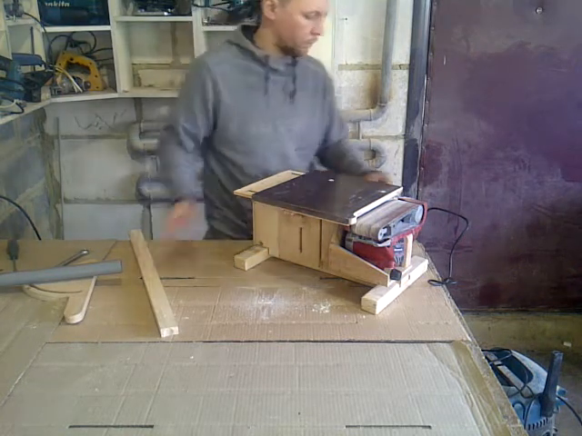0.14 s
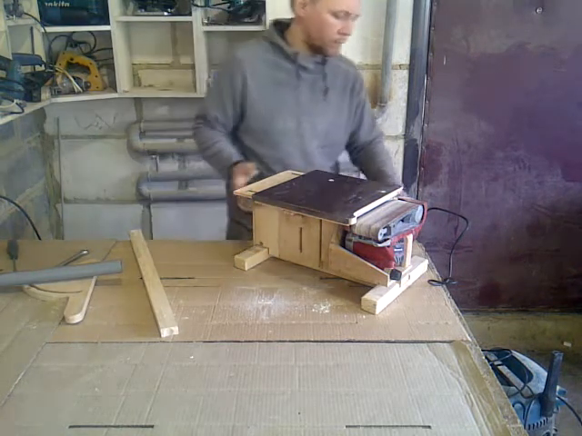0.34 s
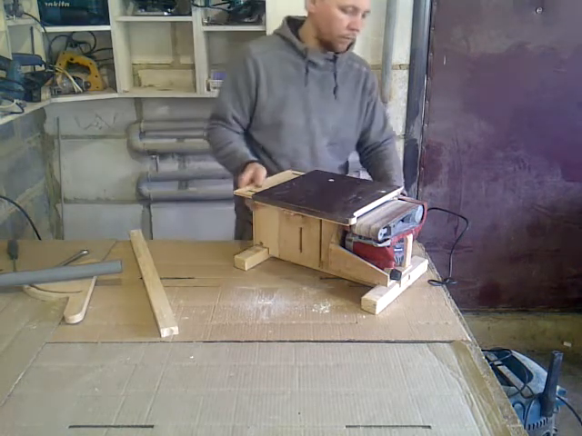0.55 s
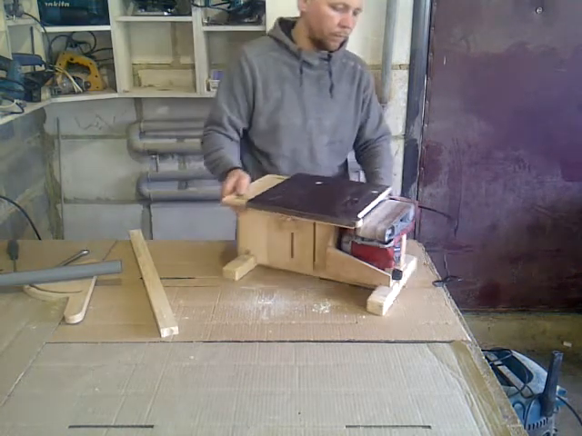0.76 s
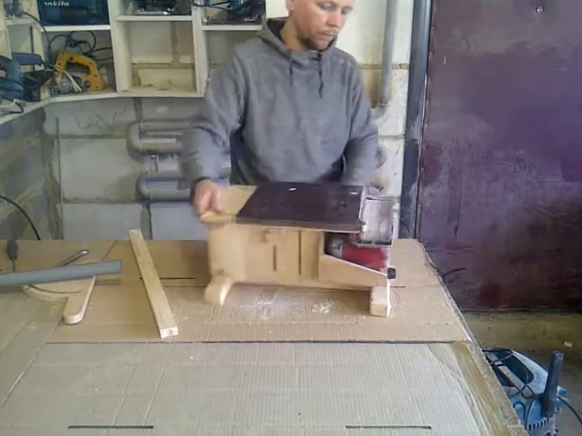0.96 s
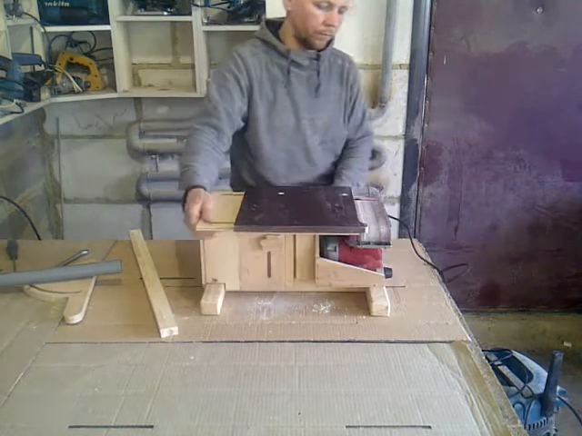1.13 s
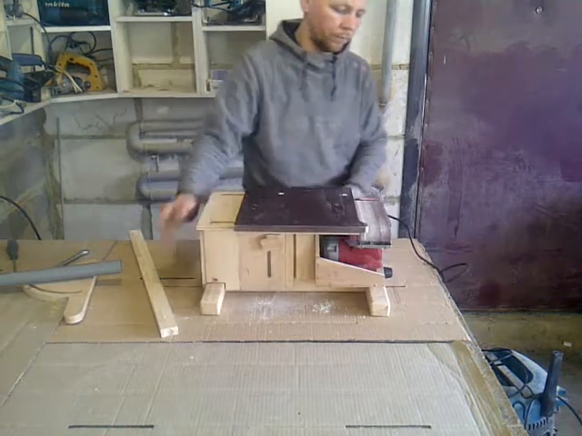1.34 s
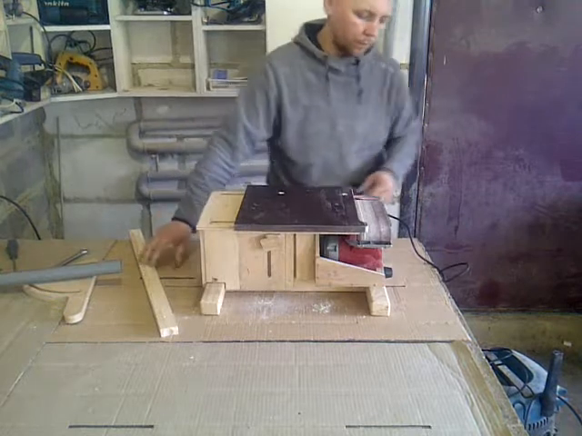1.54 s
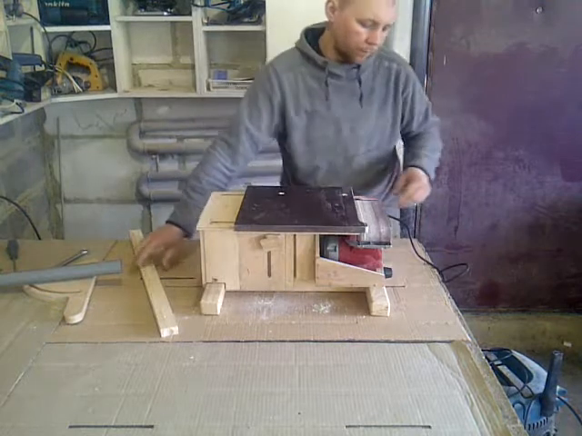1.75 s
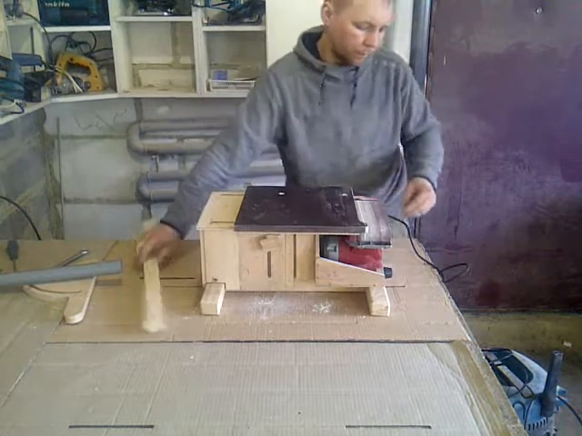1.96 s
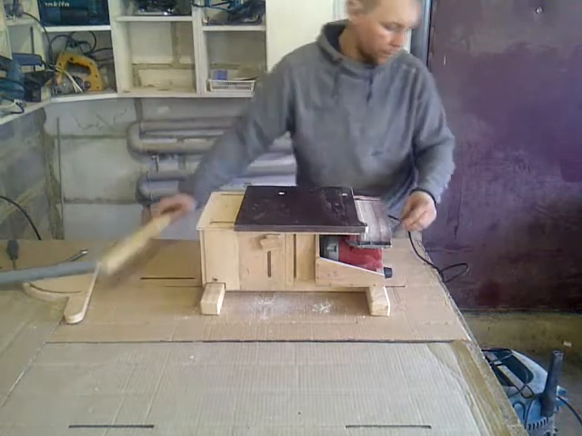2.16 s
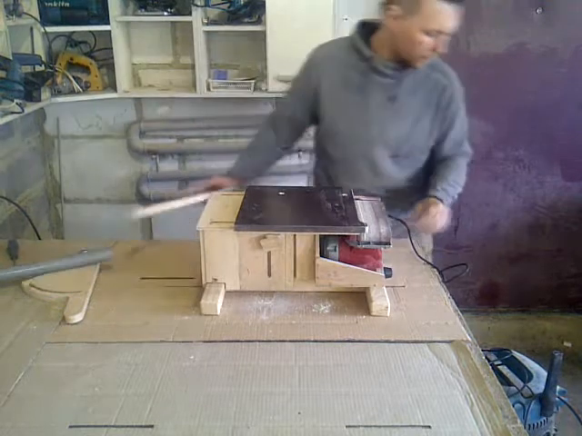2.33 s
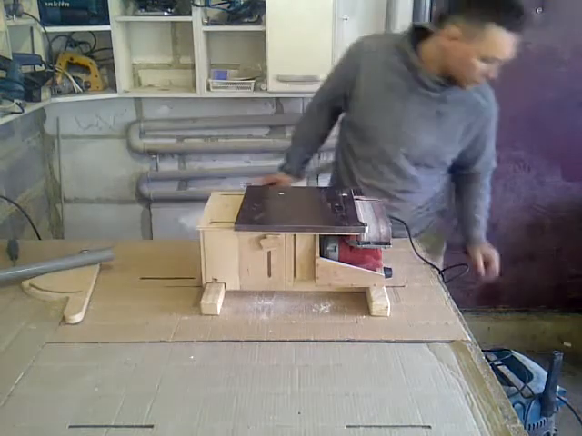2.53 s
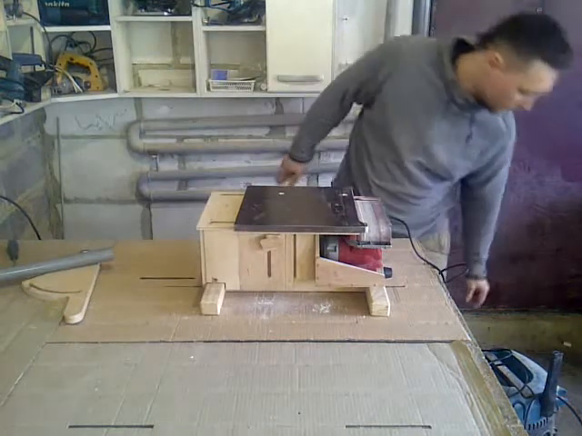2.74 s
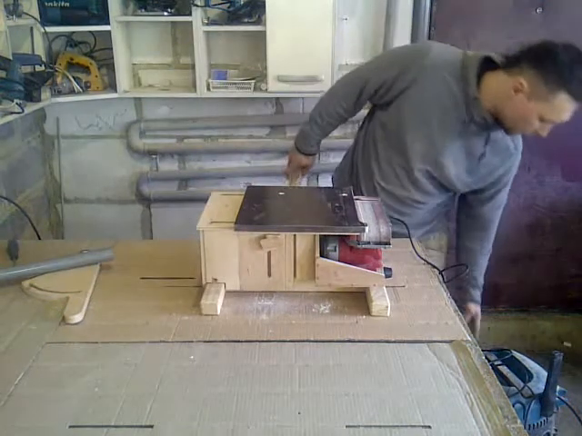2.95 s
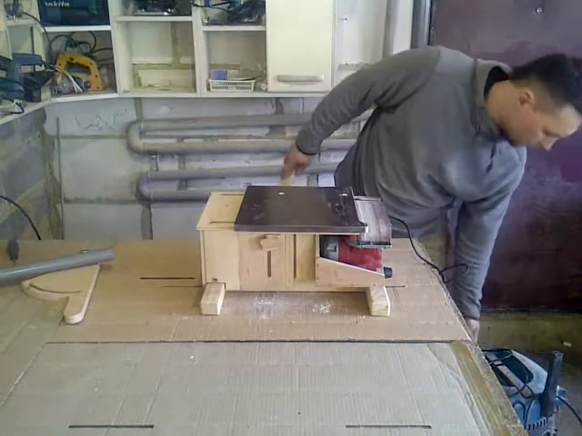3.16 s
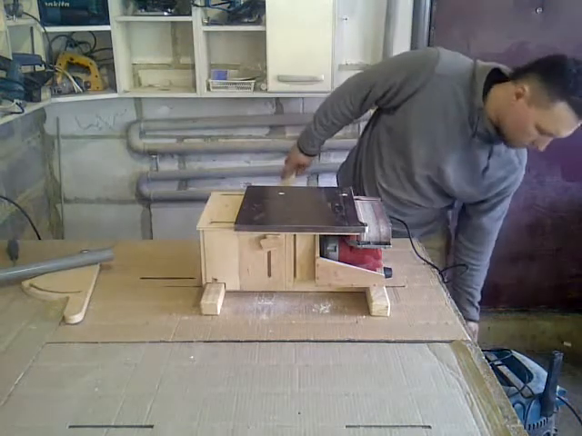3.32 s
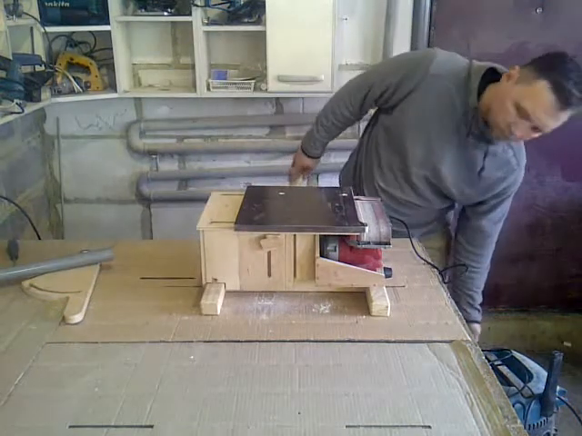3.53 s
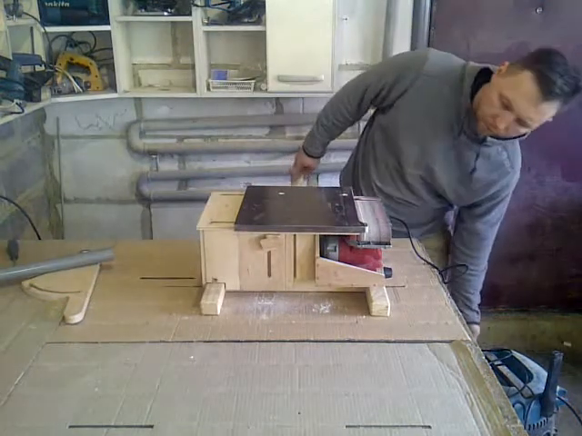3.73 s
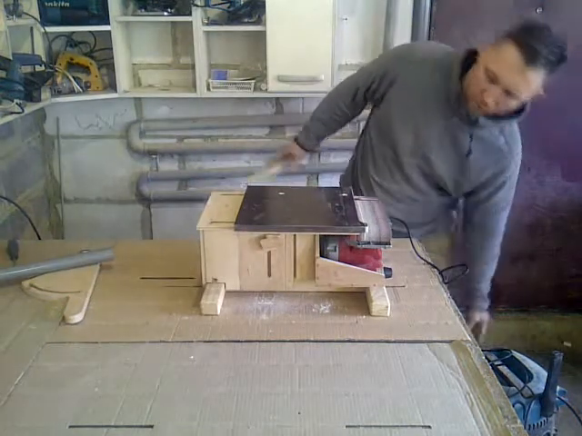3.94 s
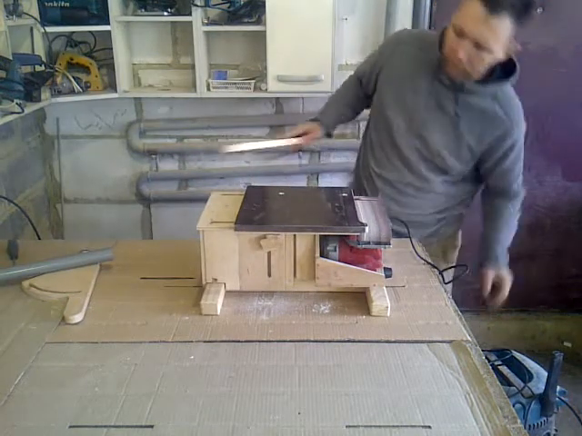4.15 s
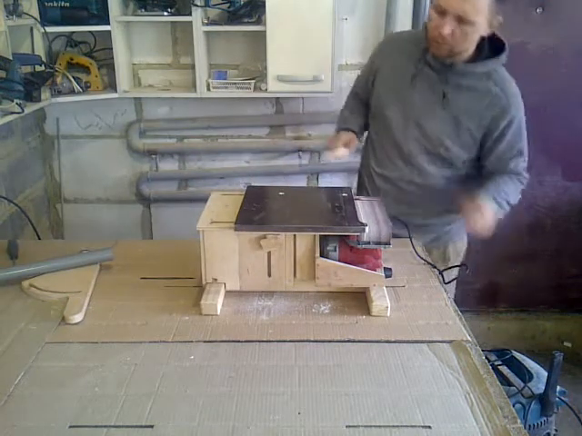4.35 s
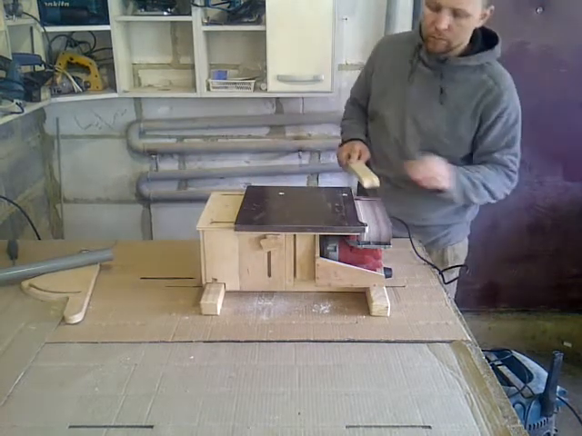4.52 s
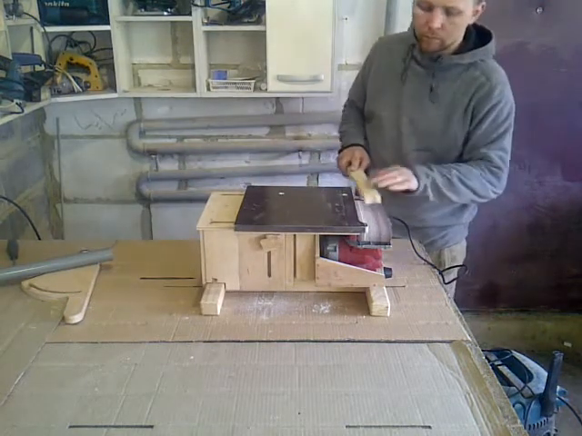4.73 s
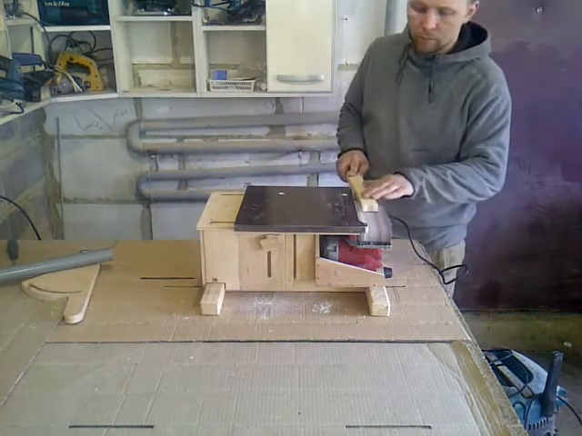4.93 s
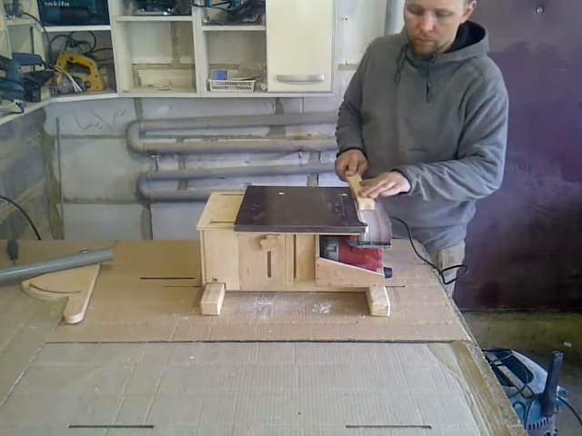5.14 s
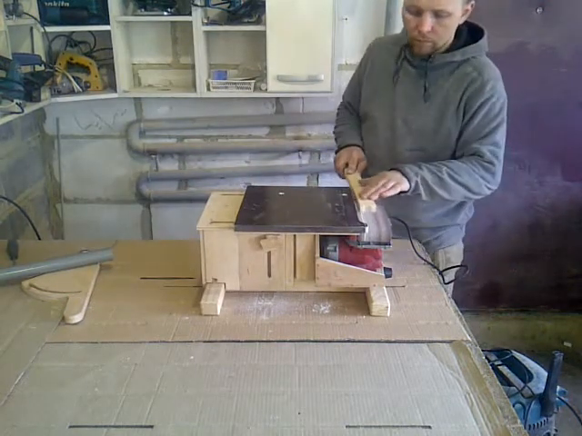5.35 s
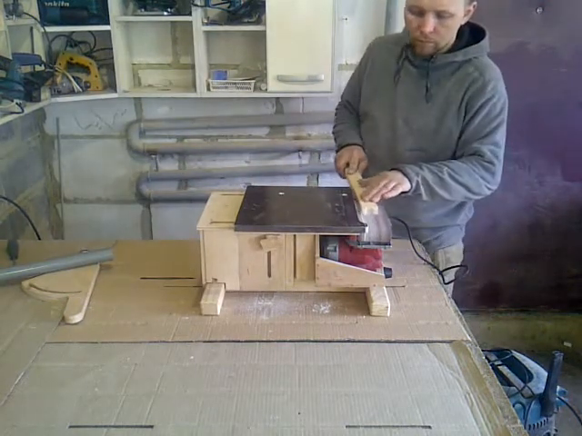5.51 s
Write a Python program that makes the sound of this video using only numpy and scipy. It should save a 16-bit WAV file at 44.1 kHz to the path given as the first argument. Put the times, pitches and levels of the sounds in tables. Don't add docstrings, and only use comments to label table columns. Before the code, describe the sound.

A small mono microphone across a reverberant workshop picks up faint hiss and soft rustling. At about 0.6 s a wooden jig is nudged on cardboard, its feet bumping near 0.68 s. From 0.9 to 1.3 s it is dragged in rough, uneven scrapes with bright stick-slip ticks, low rumble and a hard wooden bump at 1.08 s. Light cloth rustles and sliding follow from 1.6 to 2.1 s as a lath is picked up. At 2.2 s it chatters quickly against a pipe, woody and dry, leaving a thin metallic ring. Only faint rustling and a tiny tap remain until 3.74 s, when a belt sander switches on: a quick rising whine and sudden loud, boxy roar of air and belt, reaching full speed by about 4.5 s. It runs steadily, then from 5.1 s its pitch sags and its treble dulls slightly as wood is pressed on, still roaring at the end.

```python
import sys
import numpy as np
from scipy import signal
from scipy.fft import rfft, irfft
from scipy.io import wavfile
from scipy.ndimage import uniform_filter1d

SR = 44100
rng = np.random.default_rng(int(sys.argv[2]) if len(sys.argv) > 2 else 0)


def generate_wav(signal):
    frames = np.transpose(np.atleast_2d(signal))
    scaled = np.clip(frames, -1, 1) * 32767
    pcm = np.round(scaled).astype(np.int16)
    wavfile.write(sys.argv[1], SR, pcm)


def invert_db(level):
    return 10 ** (np.asarray(level, dtype=float) / 20)


N = 250488
SWITCH_ON_S, BELT_FREE_S = 3.738, .13
FULL_SPEED = 475


def rms_one(x):
    return x / np.sqrt(np.mean(x ** 2) + 1e-20)


def in_time(rows):
    s, *columns = np.transpose(rows)
    return [np.interp(np.arange(N) / SR, s, c) for c in columns]


def drift(rate):
    r = np.exp(-80 * np.pi * rate / SR)
    slow = signal.lfilter([1], [1, -2 * r, r * r], rng.standard_normal(N // 40 + 2002))
    slow = rms_one(slow[2000:])
    return np.interp(np.arange(N) / 40, np.arange(len(slow)), slow)


def colour(x, spectrum):
    hz, level_db = np.transpose(spectrum)
    grid = np.maximum(np.arange(N // 2 + 1) * SR / N, 1)
    return rms_one(irfft(rfft(x) * invert_db(np.interp(np.log(grid), np.log(hz), level_db)), N))


def grains(per_s, spread_db):
    sizes = invert_db(spread_db * np.minimum(rng.exponential(1, N), 4)) * rng.choice([-1, 1], N)
    return sizes * (rng.random(N) < per_s / SR)


def ring(clicks, hz, t60):
    r, w = invert_db(-60 / (t60 * SR)), 2 * np.pi * hz / SR
    return signal.lfilter([0, np.sin(w)], [1, -2 * r * np.cos(w), r * r], clicks + 1e-18)


def resonances(x, rows, ring_factor):
    return sum(invert_db(db) * rms_one(ring(x, hz, ring_factor / width)) for hz, width, db in rows)


def click(s, peak_db):
    return invert_db(peak_db) * (np.arange(N) == round(s * SR))


def swells(rows):
    time = np.arange(0, N + 16, 16) / SR
    power = 0
    for s, rise, fall, db in rows:
        away = np.maximum((s - time) / abs(rise), (time - s) / abs(fall))
        power = power + invert_db(db - 20 * away) ** 2
    return np.interp(np.arange(N) / SR, time, np.sqrt(power))


# frequency in Hz, density in dB per Hz.
FLOOR = [(24, -45), (40, -29), (170, -9), (366, -2.5), (392, -3), (438, -3), (575, -6), (689, -6),
         (2550, -11), (6300, -10.5), (8840, -26), (11500, -66), (19400, -120)]


def microphone_floor():
    return invert_db(-65) * colour(rng.standard_normal(N), FLOOR)


def workshop(x):
    time, t60_s, room_db, wall_cut_hz = np.arange(SR) / SR, 0.47, -19.5, 2100
    tail = rng.standard_normal(SR) * invert_db(-60 * time / t60_s) * (time > .012)
    tail = signal.sosfilt(signal.butter(1, wall_cut_hz, fs=SR, output="sos"), tail)
    return invert_db(room_db) * signal.fftconvolve(x, tail / np.sqrt(np.sum(tail ** 2)))[:N]


# time in seconds, pressure in dB, sliding speed in dB.
DRAG = [
    (.575, -71, -80),
    (.63, -49.5, -49.5),
    (.74, -50, -48),
    (.91, -46.5, -43.5),
    (.96, -43.5, -37),
    (1.04, -49.5, -37.5),
    (1.09, -42, -39.5),
    (1.15, -47.5, -39.5),
    (1.27, -64.5, -63),
]
# peak in seconds, rise and fall in seconds per 20 dB (sign ignored), level in dB, brightness in dB.
MOVES = [(.08, .012, 0.16, -62.5, 2.5), (.35, .07, 0.3, -67, 2), (0.681, 0.013, -0.12, -45.5, 0),
         (1.3, 0.067, 0.3, -64.5, 3), (1.405, .015, .06, -64, 5), (1.61, .02, 0.2, -63.5, 1),
         (1.7, .07, 0.06, -57, 6.5), (1.805, .015, 0.26, -57.5, -5), (1.86, 0.059, .1, -56.5, 0.5),
         (1.892, 0.016, 0.23, -53.5, 5), (2.0, 0.046, 0.09, -57, 0), (2.204, .004, 0.05, -60, 1),
         (2.216, .006, 0.0741, -47, 8.5), (2.284, 0.066, 0.07, -48, -2), (2.312, 0.027, 0.17, -57, -1),
         (2.47, .3, 0, -73, 4), (2.632, .03, 0.6, -70, -5), (2.812, 0.3, .22, -62.5, 2.5)]
# peak in seconds, level in dB.
THUDS = [(.36, -62), (.95, -44.5), (1.1, -45.5), (1.16, -53), (1.29, -58.5), (1.615, -57), (1.9, -56),
         (2.226, -72), (2.312, -52)]
# peak in seconds, level in dB.
SWISHES = [(.955, -45), (1.15, -52), (1.82, -55.5), (2.0, -59.5)]
# frequency in Hz, density in dB per Hz.
SCRAPE = [(290, -37), (500, -8.5), (892, -7.5), (1050, -2.5), (1280, -4.5), (1660, -0.5), (1800, -8),
          (2340, -47), (3960, -120)]
SCRAPE_EDGE = [(970, -51), (1650, -3.5), (1900, 6.5), (2420, 4.5), (2670, 0.5), (3210, -5), (3850, -15),
               (4200, -27), (5460, -37), (9240, -120)]
SCRATCH = [(1900, -40.5), (2500, -3), (3200, 0.5), (4200, -2.5), (5200, -29), (8000, -100)]
RUMBLE = [(18, -40), (30, -20), (112, -14.5), (151, 2.5), (333, -8), (387, 0), (600, -23.5), (780, -38),
          (1320, -120)]
HISS = [(2060, -26), (3500, -0.5), (5360, -8), (6050, -14), (7060, -7), (7510, -16), (8840, -40),
        (11500, -68), (19400, -120)]
TREMOR = [(35, -29.5), (60, -1.5), (85, 0), (120, -6), (180, -40)]


def handling():
    time = np.arange(N) / SR
    dragging = (time > DRAG[0][0]) * (time < DRAG[-1][0])
    pressure, sliding = invert_db(np.array(in_time(DRAG))) * dragging
    dull_moves = [(s, rise, fall, db - bright_db / 2) for s, rise, fall, db, bright_db in MOVES]
    sharp_moves = [(s, rise, fall, db + bright_db / 2) for s, rise, fall, db, bright_db in MOVES]
    dull = np.hypot(pressure, swells(dull_moves))
    sharp = np.hypot(sliding, swells(sharp_moves))
    thud = np.hypot(invert_db(-9.5) * dull, swells([(s, .06, 0.1, db) for s, db in THUDS]))
    swish = np.hypot(invert_db(-8.5) * sharp, swells([(s, 0.051, 0.09, db) for s, db in SWISHES]))

    slips = grains(per_s=3000, spread_db=2.0) + 0.26 * rng.standard_normal(N)
    catch = invert_db(2.0 * drift(50))
    scrape = dull * colour(slips, SCRAPE) + sharp * colour(slips, SCRAPE_EDGE)
    rumble = thud * invert_db(0.83 * drift(23)) * colour(rng.standard_normal(N), RUMBLE)
    hiss = swish * colour(grains(per_s=17000, spread_db=-2.0), HISS)
    brightness = (sharp / (dull + 1e-9)) ** 0.43
    scratch = invert_db(-17.5 + 2.5 * drift(9)) * sharp * brightness * colour(slips, SCRATCH)
    shake = np.hypot(invert_db(-90 + 4.0 * drift(3)), invert_db(-18) * thud)
    tremor = shake * colour(rng.standard_normal(N), TREMOR)
    return catch * (scrape + scratch) + rumble + hiss + tremor


def snaps(events, bands, length_s):
    out, time = np.zeros(N), np.arange(600) / SR
    for (s, peak_db, hz), noise in zip(events, rng.standard_normal((len(events), 600))):
        push = noise * time * np.exp(-time / length_s)
        for low, high, db in bands:
            band = signal.butter(2, [hz * low, hz * high], "band", fs=SR, output="sos")
            part = signal.sosfilt(band, push)
            out[round(s * SR):][:600] += invert_db(peak_db + db) * part / np.abs(part).max()
    return signal.sosfilt(signal.butter(8, 7200, fs=SR, output="sos"), out)


# time in seconds, peak in dB, ring in Hz.
TICKS = [(.9208, -37, 4500), (.9365, -25, 4800), (.9437, -29, 4700), (.9507, -25, 5500), (.9575, -27, 5300),
         (.9637, -24, 4700), (1.1245, -36, 5500), (1.1390, -26, 4900), (1.1450, -33, 4900),
         (1.1575, -30, 5100), (1.1755, -36, 4600), (1.1900, -34, 4700), (1.2085, -32, 4700),
         (1.2265, -31, 4500), (1.2450, -34, 4900), (1.2595, -44, 4500), (1.2780, -46, 4700),
         (1.6806, -45, 4800)]
# time in seconds, peak in dB, ring in Hz.
BUMPS = [
    (.6248, -32, 3300),
    (.6762, -29, 2400),
    (.6812, -26, 1800),
    (1.0800, -16, 2600),
    (1.0962, -22, 2000),
    (1.8885, -37, 2100),
    (2.8550, -49, 1500),
]


def contacts():
    ticks = snaps(TICKS, [(.87, 1.16, 1), (1.25, 1.5, -8)], length_s=.0006)
    return ticks + snaps(BUMPS, [(.7, 1, -3), (1, 1.4, -5)], length_s=.0008)


# time in seconds, strength in dB.
KNOCK = [
    (2.2065, -31),
    (2.2125, -31),
    (2.2180, -31),
    (2.2230, -33),
]
# frequency in Hz, level in dB, t60 in seconds.
LATH = [(526, 3.5, 0.036), (782, -2, 0.038), (1090, -9.5, 0.052), (1810, 1.5, 0.065), (2112, -9, 0.12)]


def lath():
    shape = (len(LATH), len(KNOCK))
    strengths = rng.choice([-1, 1], shape) * invert_db(rng.normal(0, 1.9, shape))
    out = np.zeros(N)
    for (hz, level_db, t60), row in zip(LATH, strengths):
        touches = sum(k * click(s, db + level_db) for k, (s, db) in zip(row, KNOCK))
        out += ring(touches, hz, t60)
    return signal.sosfilt(signal.butter(2, 300, "high", fs=SR, output="sos"), out)


# frequency in Hz, peak in dB, t60 in seconds.
PIPE = [(1901, -42, .9), (1898.4, -43, .55), (1490, -50, .3), (2121, -43, .3), (5130, -56, .45),
        (5140, -58, .4)]
# time in seconds, peak in dB, frequency in Hz, t60 in seconds.
PIPE_BRUSH = (2.07, -65, 1810, 1.5)


def pipe():
    out = ring(click(*PIPE_BRUSH[:2]), *PIPE_BRUSH[2:])
    for k, (hz, peak_db, t60) in enumerate(PIPE):
        out = out + (-1) ** k * ring(click(KNOCK[0][0], peak_db), hz, t60)
    return out


# time in seconds, speed lost in turns per second.
LOAD = [
    (5.02, 0),
    (5.1, 7),
    (5.3, 26),
    (5.4, 28),
    (5.5, 34),
    (5.68, 46),
]


def shaft_speed():
    on = np.maximum(np.arange(N) / SR - SWITCH_ON_S, 0)
    run_up = FULL_SPEED - 348 * np.exp(-on / .162)
    belt_drag = 107 * np.maximum(1 - on / BELT_FREE_S, 0)
    return run_up - belt_drag - in_time(LOAD)[0]


# time in seconds, level in dB.
ROAR = [(3.725, -63), (3.745, -30), (3.773, -18.5), (3.833, -18), (3.95, -14.5), (4.083, -14), (4.311, -17),
        (4.487, -15), (4.889, -17), (5.155, -14.5), (5.22, -18), (5.68, -15.5)]
# frequency in Hz, density in dB per Hz.
ROAR_BODY = [(35, -51.5), (60, -42), (200, -22), (300, -20), (420, -8), (700, -9.5), (1000, -10),
             (1300, -7), (1420, -2.5), (1750, 2), (2100, -2.5), (2500, 1.5), (2800, -10), (3600, -59)]
ROAR_TREBLE = [(1650, -29.5), (2800, -7), (3430, 0.5), (4260, -5.5), (4850, -9.5), (4960, -8), (5540, -14),
               (7120, -14), (7400, -16.5), (8840, -41.5), (11500, -59), (19400, -120)]
# frequency in Hz, width in Hz, level in dB.
HOUSING = [(1427, 7.9, -37.5), (1580, 60, -30), (1647, 6.4, -16.5), (1810, 100, -25.5), (2210, 38, -15),
           (2405, 98, -16), (1123, 19, -25.5), (385, 38, -24.5)]
PANELS = [(1002, 4.7, -29), (1102, 17, -34), (1396, 14, -28), (1552, 13, -18.5), (2384, 46, -22.5),
          (1845, 18, -23.5), (1996, 25, -28)]
OUTLET = [(3089, 17, -20.5), (3330, 28, -17.5), (3443, 24, -17), (3554, 55, -19.5), (3719, 40, -19.5),
          (4010, 33, -21.5)]


def roar():
    time = np.arange(N) / SR
    air = colour(rng.standard_normal(N), ROAR_BODY)
    boxed = resonances(air, HOUSING + PANELS, 2.0)
    body = invert_db(in_time(ROAR)[0] + 1.15 * drift(34)) * rms_one(air + boxed)
    flutter = invert_db(-22 - 0.0459 * in_time(LOAD)[0] + 0.27 * drift(12.0))
    blast = colour(rng.standard_normal(N), ROAR_TREBLE)
    treble = flutter * rms_one(blast + resonances(blast, OUTLET, 1.9))
    treble *= np.clip((time - SWITCH_ON_S) / 0.054, .5, 1)
    return (body + treble * (shaft_speed() / FULL_SPEED) ** 0.78) * (time > SWITCH_ON_S)


# shaft rate in Hz, level in dB rms.
JIG = [(290, -62), (314, -25), (338, -16.5), (366, -18), (385, -26.5), (402, -18), (445, -25), (470, -30.5)]
# multiple of shaft rate, level in dB rms.
LOW_ORDERS = [(.417, -46), (.5, -43.5)]
# multiple of shaft rate, level in dB re fan tone.
FAN_ORDERS = [(4, 0), (9, -9), (10, 0), (11, -10), (16, -19)]
# peak in seconds, rise and fall in seconds per 20 dB, level in dB.
WHINE = [
    (3.776, .02, .05, -19),
    (3.804, .03, .04, -19.5),
    (3.83, .06, .13, -31),
]


def motor_tones():
    time, speed = np.arange(N) / SR, shaft_speed()
    angle = 2 * np.pi * np.cumsum(speed) / SR
    shaft_db = np.interp(speed, *np.transpose(JIG))
    out = invert_db(shaft_db + 0.54 * drift(30)) * np.sin(angle)
    spun_up = np.clip((time - 3.8) / .5, 0, 1)
    for order, level_db in LOW_ORDERS:
        out += spun_up * invert_db(level_db + 2.05 * drift(6.4)) * np.sin(order * angle + 0.41 * drift(16))
    at_speed = time > SWITCH_ON_S + BELT_FREE_S
    fan_db = -34.5 - 2.5 * (1 - np.exp((speed - FULL_SPEED) / 40))
    unsteady = .35 + .02 * in_time(LOAD)[0]
    for order, level_db in FAN_ORDERS:
        wavering = at_speed * invert_db(fan_db + level_db + 2 * drift(15))
        out += wavering * np.sin(order * angle + unsteady * drift(25))
    out += swells(WHINE) * invert_db(3.0 * drift(90)) * np.sin(12.2 * angle + .7 * drift(120))
    return np.sqrt(2) * out * (time > SWITCH_ON_S)


def scene():
    feet, wood = contacts(), lath()
    room = workshop(feet + invert_db(2.5) * wood)
    return (microphone_floor() + room + handling() + feet + wood + pipe() + roar() + motor_tones())[None]


def band_limit(x):
    return signal.sosfilt(signal.butter(12, 8990, fs=SR, output="sos"), x)


def record(dry):
    thin = signal.sosfilt(signal.butter(2, 61.4, "high", fs=SR, output="sos"), dry)
    band = signal.sosfiltfilt(signal.butter(6, [7780, 8280], "band", fs=SR, output="sos"), thin)
    dropped = np.repeat(rng.random(N // 1024 + 1) < .62, 1024)[:N]
    dropped = dropped * (np.arange(N) > SWITCH_ON_S * SR)
    thin = thin - uniform_filter1d(1. * dropped, size=60) * band
    return band_limit(1.17 * np.tanh(thin / 1.252))


dry = scene()
out = record(dry)
generate_wav(out)
```